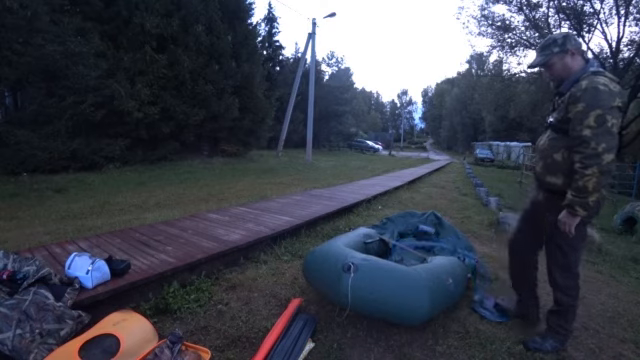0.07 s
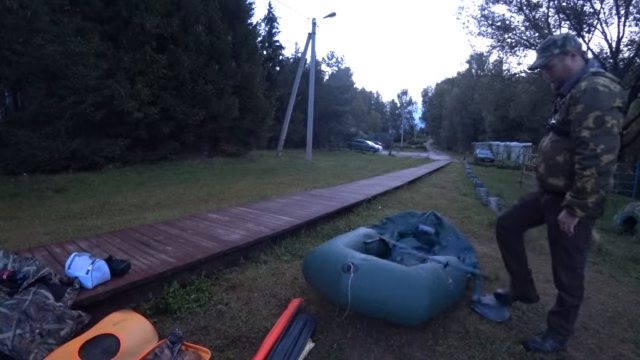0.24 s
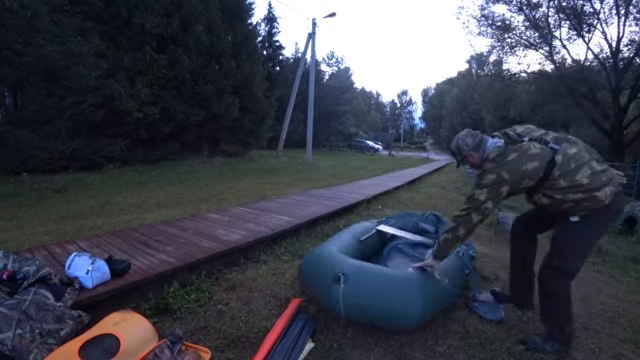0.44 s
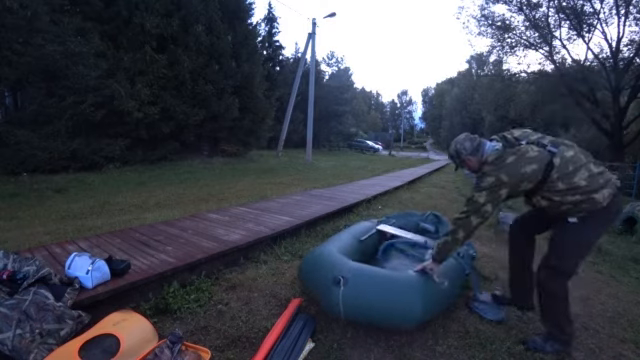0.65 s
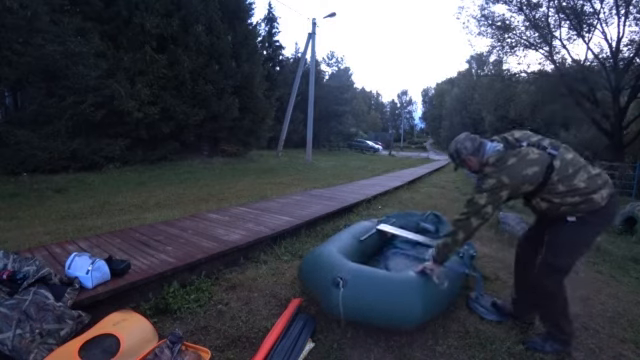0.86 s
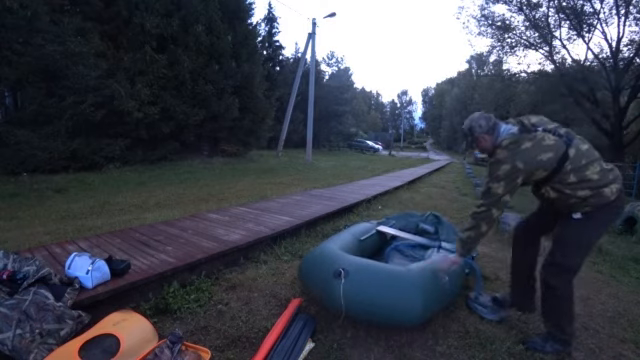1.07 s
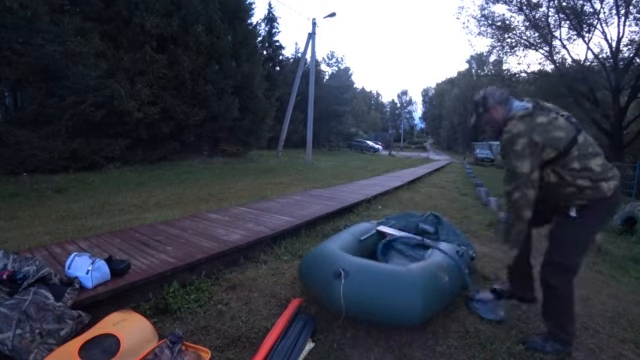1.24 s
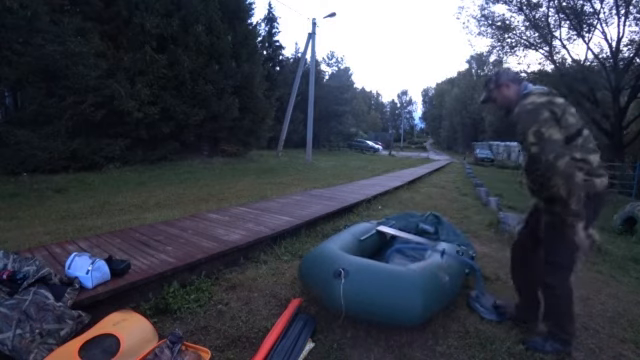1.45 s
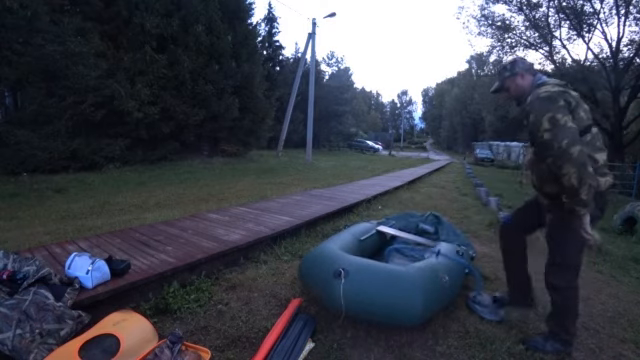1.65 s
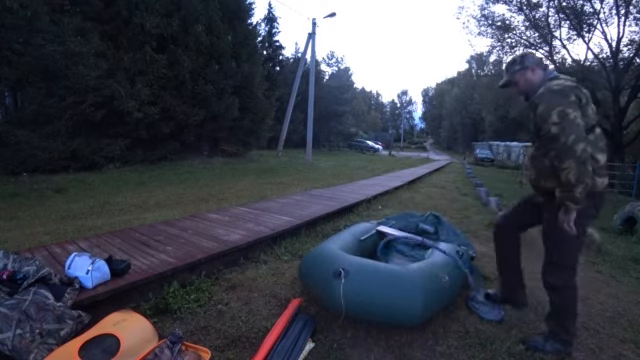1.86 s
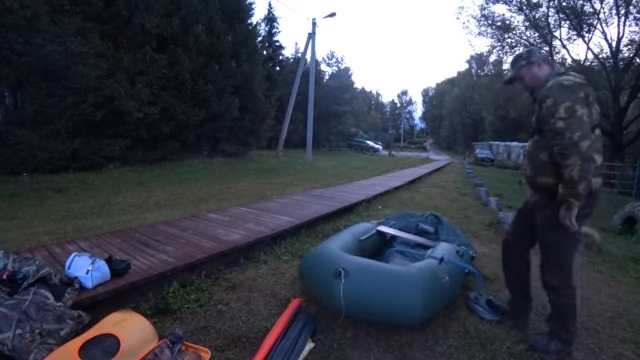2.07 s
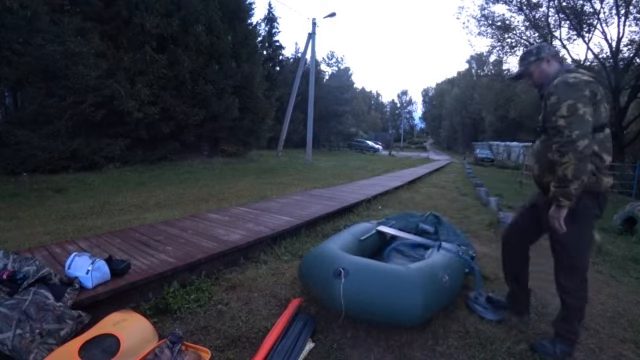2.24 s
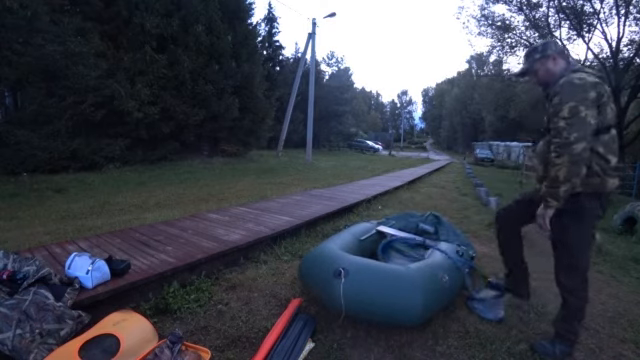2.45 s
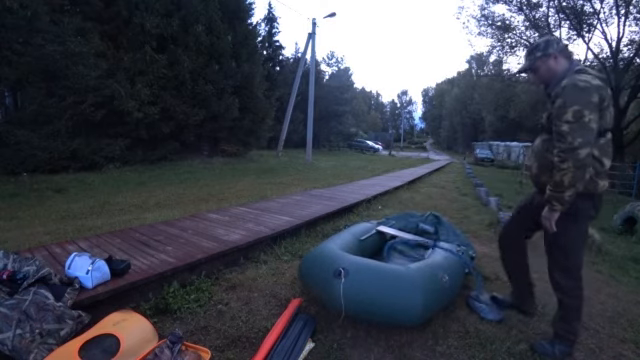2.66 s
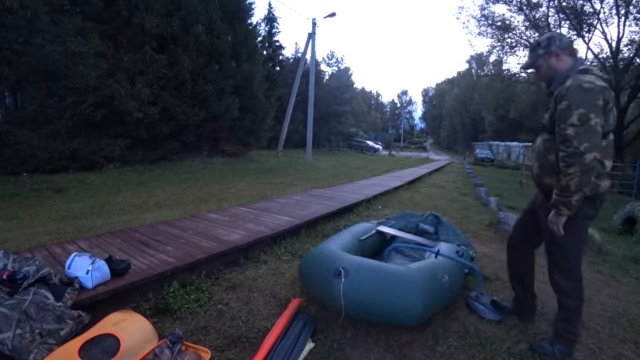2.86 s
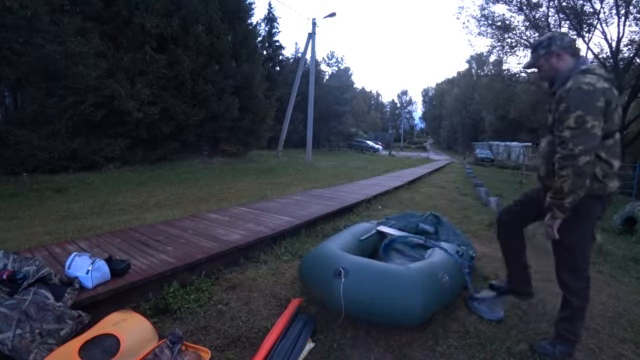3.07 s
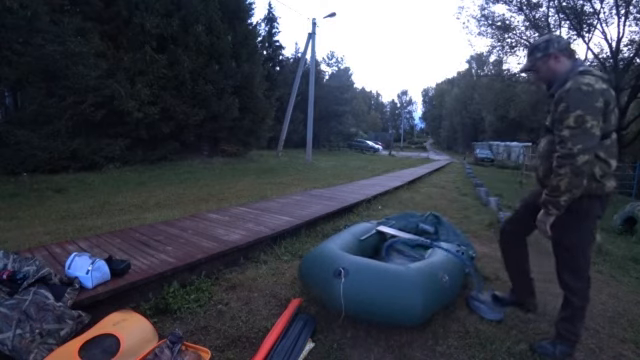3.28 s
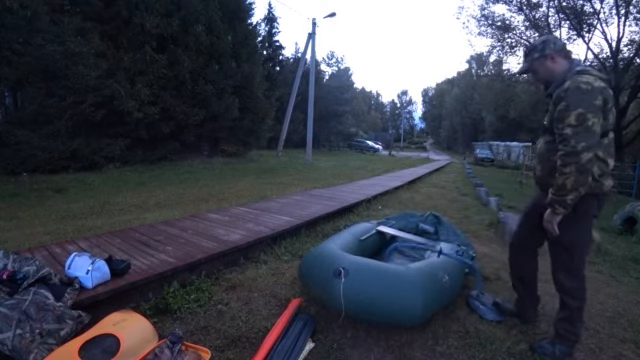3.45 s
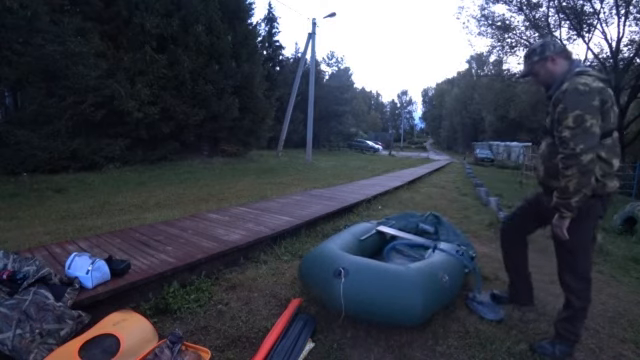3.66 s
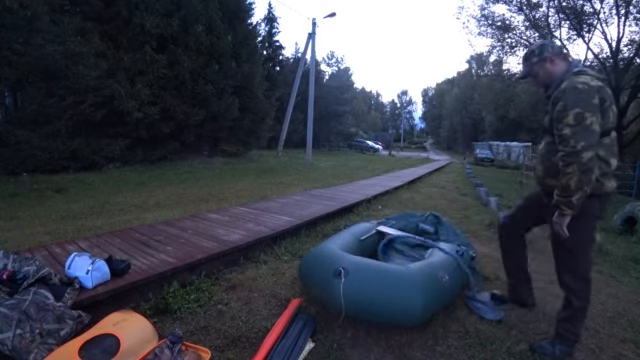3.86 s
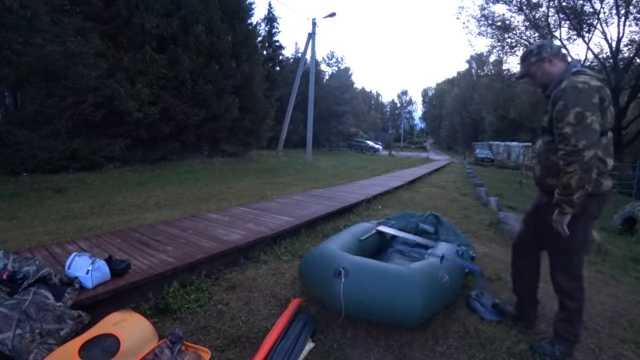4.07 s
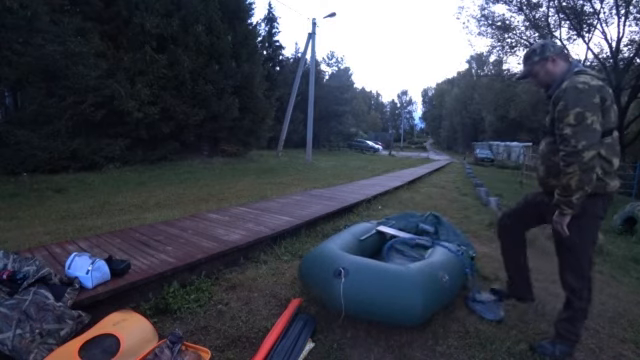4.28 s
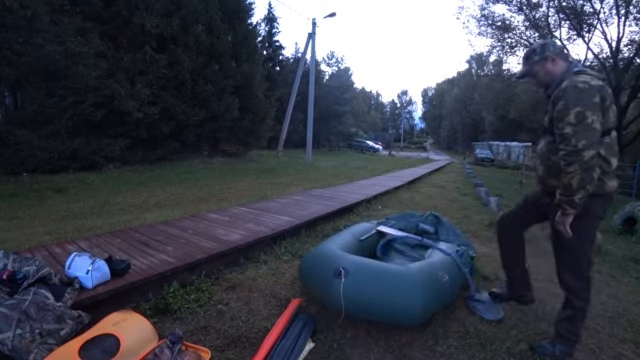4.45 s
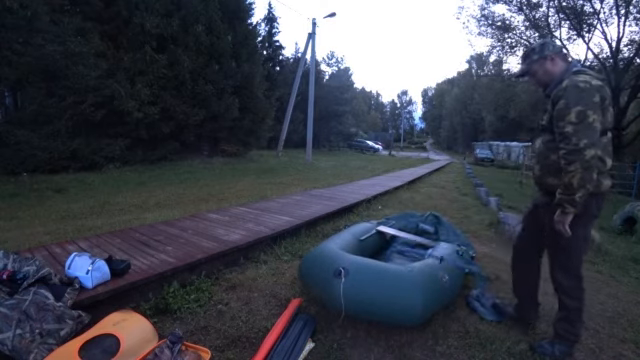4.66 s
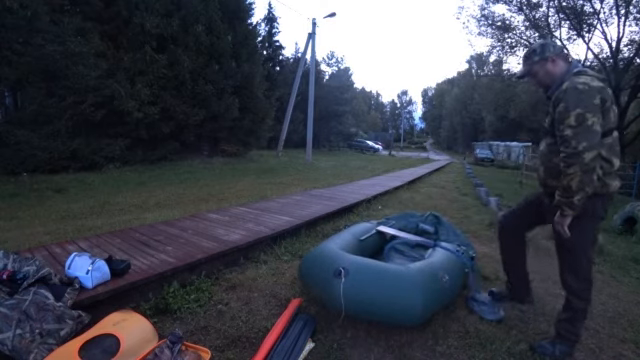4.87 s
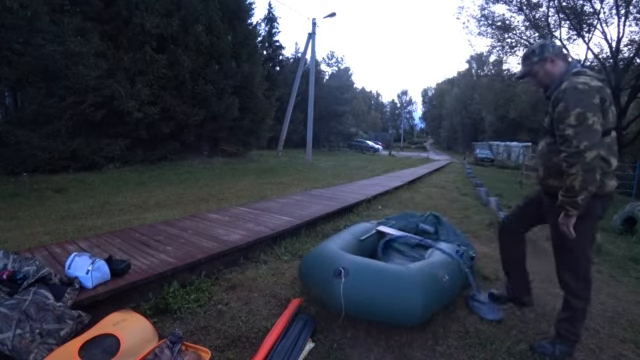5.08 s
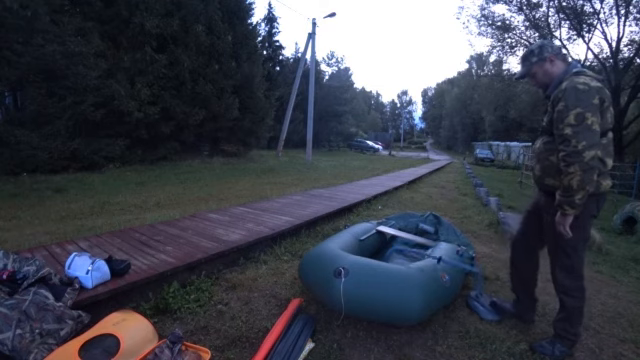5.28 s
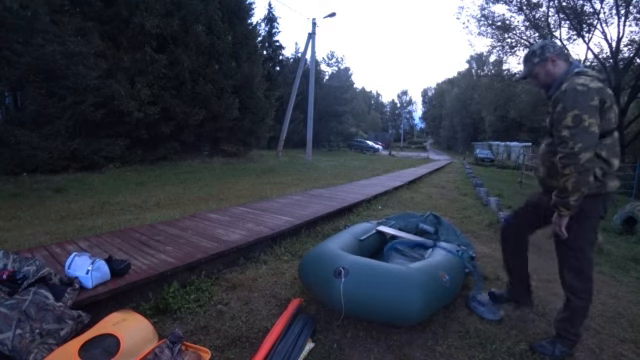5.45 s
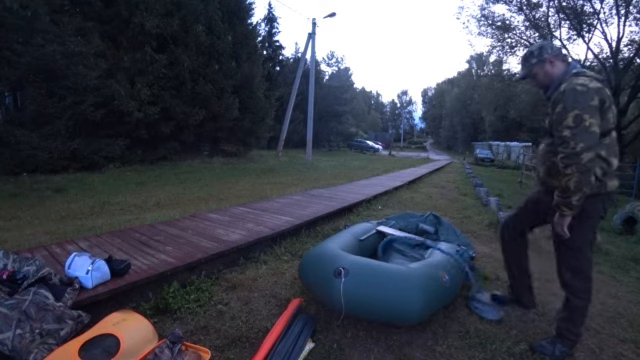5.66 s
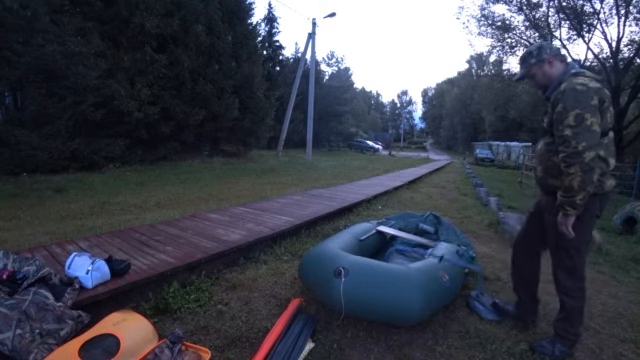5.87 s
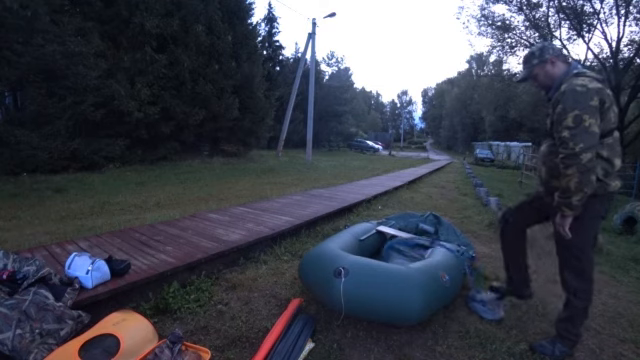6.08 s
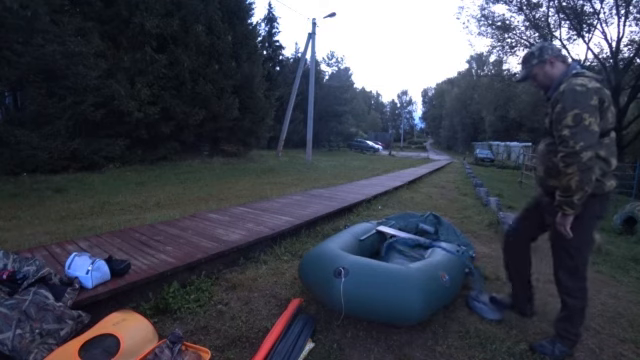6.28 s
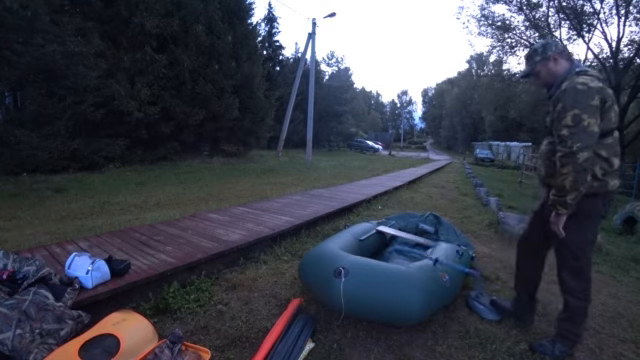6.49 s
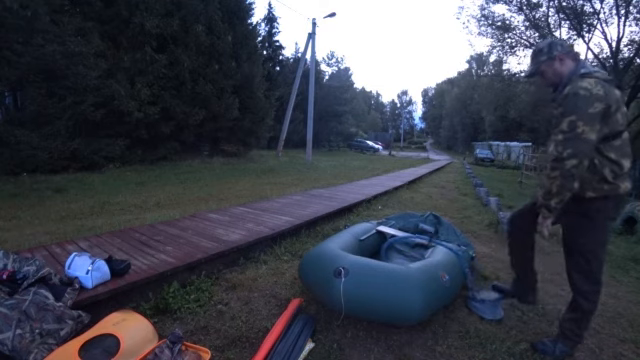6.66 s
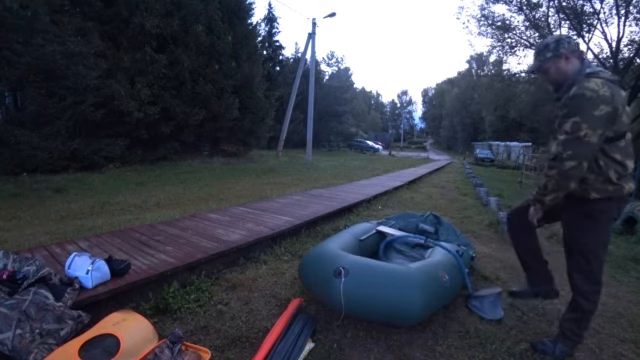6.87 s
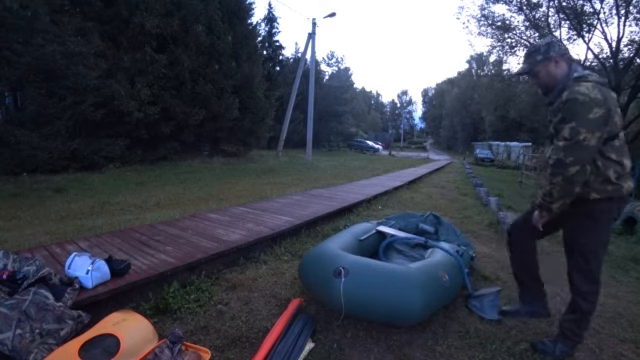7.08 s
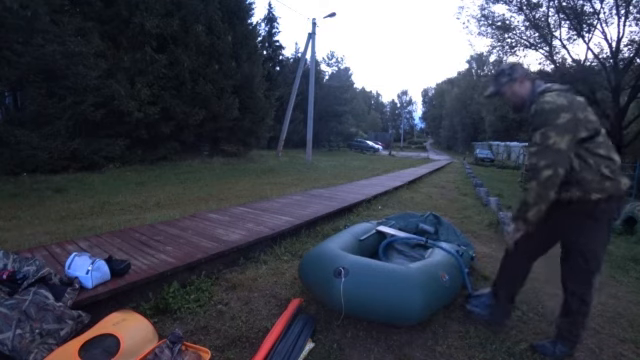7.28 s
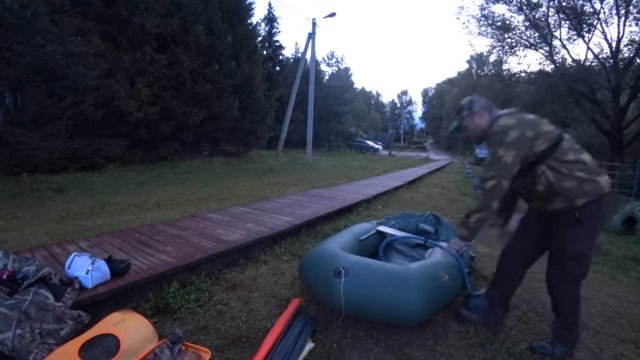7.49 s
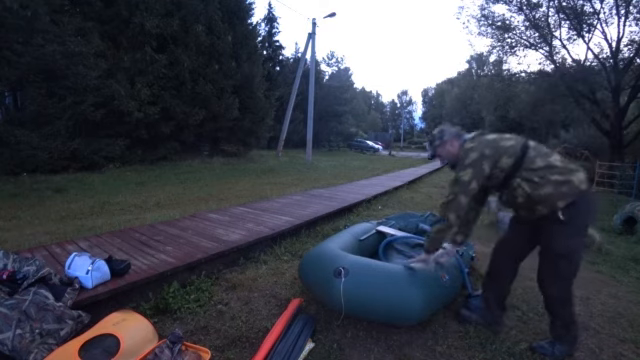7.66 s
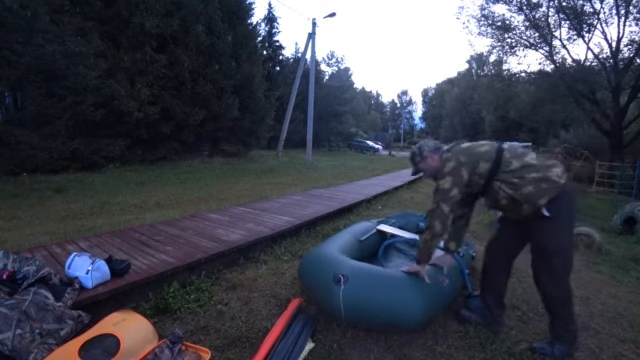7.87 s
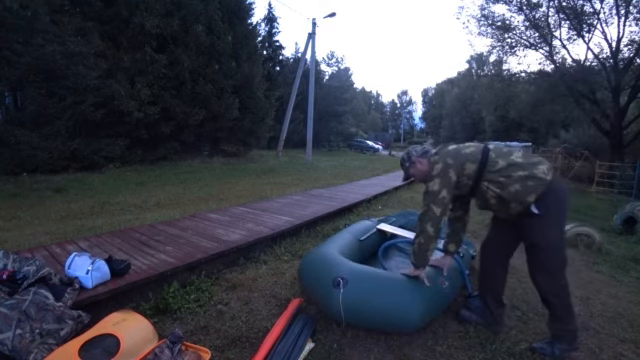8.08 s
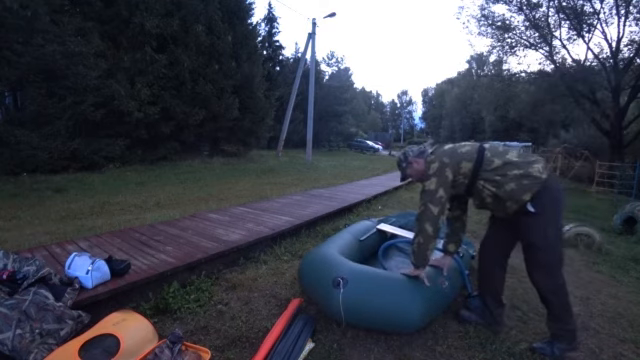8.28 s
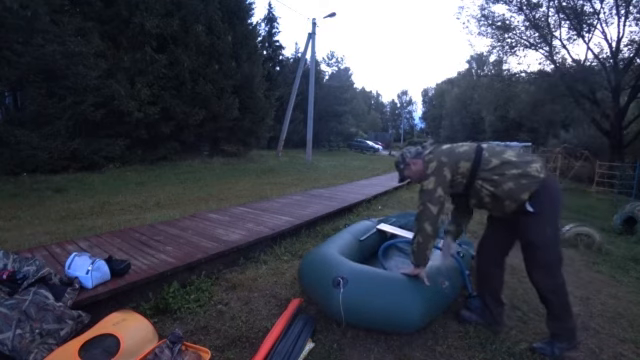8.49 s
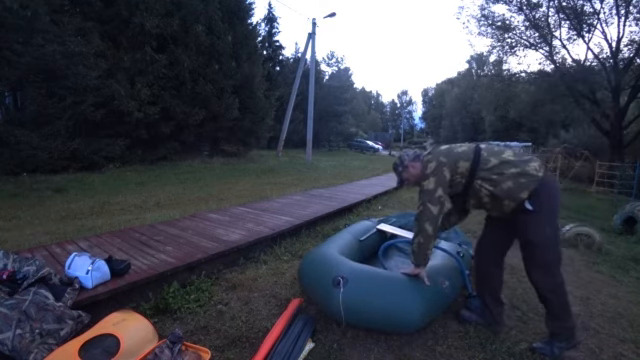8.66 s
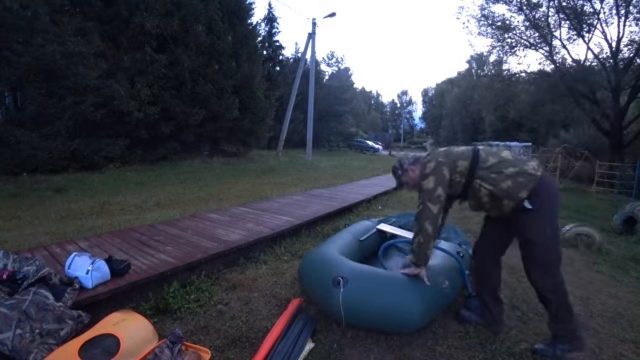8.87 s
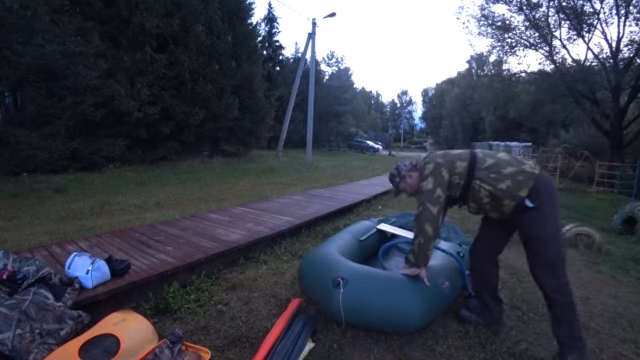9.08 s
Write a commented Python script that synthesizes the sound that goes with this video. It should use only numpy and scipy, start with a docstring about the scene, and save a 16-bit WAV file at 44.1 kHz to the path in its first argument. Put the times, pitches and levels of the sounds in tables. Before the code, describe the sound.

A foot pump hisses and gasps in steady strokes with knocks and clicking flap, inflating a rubber boat outdoors, then stops for soft rubbing.

```python
"""Broad hisses swell and fade about every 0.6 s, with narrower rushes of air, knocks and ticks between them.
A foot pump fills a rubber boat on a grassy bank: each tread presses air through the hose, and each release
sucks air in past a flap. Both are shaped noise; knocks, ticks and a squeak are short ringing tones.
A bush cricket, quiet air and a faint hum go on throughout; soft rubbing comes after the pumping stops."""
import sys
import numpy as np
from scipy import signal
from scipy.fft import rfft, irfft
from scipy.io import wavfile
from scipy.ndimage import uniform_filter1d

SR = 44100
rng = np.random.default_rng(int(sys.argv[2]) if len(sys.argv) > 2 else 0)


def generate_wav(sig):
    """Save sig (samples, or channels by samples) to the path in sys.argv[1] as 16-bit PCM at SR."""
    pcm = np.round(np.clip(np.atleast_2d(sig).T, -1, 1) * 32767).astype(np.int16)
    wavfile.write(sys.argv[1], SR, pcm)


N = 402633
T = np.arange(N) / SR  # time of each sample, s
HZ = np.fft.rfftfreq(1024, 1 / SR)  # pitches of a short-time spectrum
FRAME_T = (np.arange(N // 256 + 5) * 256 / SR)[:, None]  # time of each short-time spectrum, s

# Levels in the tables are settings at the source, ahead of the shared filters and echoes.
# Quiet outdoor air. Each row: pitch in Hz, relative level in dB.
AIR_COLOUR = [(30, -32), (60, -22), (95, -15), (120, 0), (180, -11), (260, 2), (800, 4.5), (2500, -0.5),
              (8500, -7), (11000, -7), (15900, -10.5)]
AIR_DB = -61.5
# Likeness of the air in the two channels. Each row: pitch in Hz, share from 0 to 1.
AIR_LIKENESS = [(150, 0.97), (600, 0.043), (3000, 0.041)]
# A faint far hum. Each row: pitch in Hz, relative level in dB.
HUM_TONES = [(123.8, -83.5), (247.6, -82)]
CRICKET_HZ, CRICKET_DB = 12600, -75.5
CHIRP_PERIOD_S, FIRST_CHIRP_S = .10255, .098

# Hands and cloth on the hull, one list a rub. Each row: time in seconds, body level in dB, treble level in dB.
RUBS = [
    [(7.641, -62, -70), (7.663, -55.5, -64), (7.755, -57.5, -57.5), (7.785, -62, -72), (7.85, -60.5, -70),
     (8.02, -77, -91)],
    [(8.33, -53, -67), (8.37, -65, -76), (8.42, -61, -65), (8.46, -73, -76)],
    [(8.821, -90, -71), (8.87, -68, -66), (9.016, -67, -72), (9.06, -82, -67), (9.119, -77, -86)],
]
# Sound colour of the rubbing. Each row: pitch in Hz, relative level in dB.
RUB_COLOUR = [(100, -17), (300, -5.5), (1100, 0.5), (2500, -8.5), (7000, -2), (12000, -12.5), (15900, -19)]
# Rubber on rubber. Each row: time in seconds, level in dB, pitch in Hz.
SQUEAK_PATH = [(2.736, -52, 958), (2.75, -46, 634), (2.764, -61, 557), (2.779, -54, 760)]

# Ticks of valve flap and plastic. Each row: time in seconds, relative level in dB, pitch in Hz.
TICKS = [(0.5777, -37, 3100), (.6173, -41, 3800), (.644, -38.5, 2900), (0.9426, -38, 2600),
         (1.2463, -30, 3400), (1.271, -34, 3400), (1.2863, -32, 3750), (1.5432, -36, 4100),
         (1.811, -33, 3400), (1.8278, -25.5, 2900), (1.847, -26, 3600), (1.8587, -31, 3200),
         (1.863, -31.5, 3950), (2.4896, -36.5, 2100), (2.5096, -33.5, 6300), (2.5447, -41.5, 3400),
         (2.566, -38, 3300), (2.5856, -33, 3080), (3.1732, -33.5, 5300), (3.2235, -39.5, 3200),
         (3.2488, -38.5, 3600), (3.2614, -37, 4300), (3.8124, -33, 5130), (3.843, -38.5, 4000),
         (3.8604, -35, 3700), (4.4138, -32.5, 5300), (4.4422, -28.5, 3740), (4.462, -39, 3300),
         (4.717, -35.5, 3180), (5.0146, -34, 3780), (5.0449, -39, 3500), (5.0663, -38.5, 3300),
         (5.603, -33, 4200), (5.6388, -32, 3400), (5.6608, -34.5, 3520), (6.1669, -32, 3600),
         (6.1929, -35.5, 4270), (6.2121, -34, 3470), (7.823, -50, 2900)]
# Ringing of the flap. Each row: pitch in Hz, relative level in dB, time to fall 60 dB in seconds.
TICK_MODES = [(2500, -39, 0.021), (3470, -4.5, 0.0054), (4440, -4.5, 0.0073), (6950, 0.5, 0.0081),
              (10700, -3, 0.008)]
# Knocks of boards and taut rubber. Each row: time in seconds, relative level in dB, basic pitch in Hz.
KNOCKS = [(0.117, -43, 447), (0.192, -27, 614), (0.241, -42, 380), (0.272, -42, 330), (.3717, -32, 776),
          (.401, -34, 328), (0.4233, -19, 1050), (.4337, -20.5, 634), (.441, -17.5, 440), (.487, -36, 310),
          (0.5961, -20, 503), (.612, -16, 910), (0.737, -34, 420), (.8578, -30.5, 1120), (.885, -33, 1310),
          (0.8946, -32, 1090), (0.925, -28.5, 1090), (1.081, -8, 585), (1.135, -30.5, 300),
          (1.212, -28.5, 533), (1.2468, -23.5, 605), (1.2595, -11.5, 660), (1.2878, -27.5, 770),
          (1.351, -34, 1000), (1.5314, -32, 890), (1.5446, -27, 1050), (1.621, -26, 1100),
          (1.649, -9.5, 735), (1.695, -30, 380), (1.812, -19.5, 457), (1.8362, -18, 880),
          (1.8464, -20, 363), (2.072, -35, 700), (2.111, -33, 434), (2.2242, -32.5, 595),
          (2.2821, -18.5, 447), (2.352, -32, 350), (2.4911, -24, 480), (2.5031, -22, 332),
          (2.5227, -17.5, 414), (2.535, -18, 984), (2.5855, -18.5, 590), (2.8554, -30.5, 1080),
          (2.927, -21.5, 546), (2.935, -22, 374), (2.9533, -18.5, 750), (2.9721, -16, 433),
          (3.1904, -19, 470), (3.1986, -25.5, 445), (3.2115, -20, 1010), (3.2609, -17.5, 580),
          (3.6274, -23, 620), (3.6363, -19, 570), (3.6483, -11.5, 560), (3.672, -31, 400),
          (3.8133, -28, 440), (3.8284, -17, 510), (3.8347, -16, 875), (3.8595, -33, 690),
          (3.8784, -29, 536), (4.119, -29, 690), (4.2, -26, 724), (4.2232, -28, 680), (4.2413, -15, 540),
          (4.288, -29, 400), (4.387, -24.5, 513), (4.4245, -18, 462), (4.4378, -20, 780), (4.444, -24, 430),
          (4.4618, -28, 730), (4.705, -28, 780), (4.7181, -24.5, 1250), (4.8411, -9.5, 610),
          (4.887, -32, 480), (4.9844, -28.5, 470), (5.028, -17.5, 460), (5.0371, -15.5, 760),
          (5.0666, -29, 600), (5.0866, -28.5, 560), (5.3869, -27.5, 754), (5.4349, -13, 550),
          (5.478, -31.5, 380), (5.621, -18.5, 490), (5.6325, -24, 500), (5.6453, -26.5, 400),
          (5.66, -28.5, 500), (5.886, -32.5, 1100), (5.9069, -27, 780), (5.9676, -26, 516),
          (6.0039, -8.5, 634), (6.0452, -30.5, 450), (6.143, -29, 400), (6.1791, -18, 477),
          (6.188, -15.5, 640), (6.225, -25.5, 550), (6.4025, -28, 1120), (6.4965, -30.5, 1000),
          (6.538, -30.5, 686), (6.571, -31, 440), (6.595, -29.5, 400), (6.601, -12.5, 645),
          (6.637, -30, 423), (6.705, -36.5, 300), (7.1006, -42, 344), (7.401, -49, 1110),
          (7.823, -41.5, 920), (8.3332, -33, 860), (8.34, -35.5, 1210), (8.895, -44, 600),
          (9.0123, -42, 345), (9.085, -49, 700)]
# The hollow bellows. Each row: pitch in Hz before detuning, relative level in dB, time to fall 60 dB in seconds.
BELLOWS_MODES = [(286.4, -6, 0.053), (539, -15.5, 0.052), (994, 0, 0.016)]
OPEN_RING_DB = -3.5  # the bellows rings less while the flap is open

# Treads. Each row: full flow reached in seconds, held in seconds, hiss level in dB before rounding,
# lowest pitch left as the bellows runs flat in Hz.
TREADS = [(0.028, 0.0067, -26, 3040), (.34, .005, -47.5, 1460), (0.763, 0.11, -41.5, 1900),
          (1.41, 0.022, -34, 3320), (1.968, 0.074, -37, 2580), (2.683, 0.092, -40.5, 2677),
          (3.389, 0.059, -37, 2300), (3.99, 0.051, -37, 2430), (4.596, 0.025, -36, 2450),
          (5.199, 0.055, -37, 2780), (5.79, 0.013, -35.5, 2480), (6.351, 0.0087, -34.5, 3170)]
PRESS_DB_PER_S, EMPTY_DB_PER_S, ROUND_S = 164, 91, 0.051  # a tread swells fast and dies slowly
# Releases, one after each tread. Each row: flap opens in seconds, time to strongest in seconds,
# open for in seconds, rush level in dB.
RELEASES = [(0.142, 0.057, 0.18, -34.5), (0.368, 0.068, 0.17, -38), (1.036, 0.055, 0.2, -35),
            (1.617, 0.024, 0.21, -33.5), (2.228, 0.077, 0.28, -35.5), (2.911, 0.062, 0.23, -37),
            (3.602, 0.052, 0.2, -36.5), (4.2, 0.047, 0.21, -35.5), (4.802, 0.042, 0.198, -35.5),
            (5.393, 0.038, 0.18, -35.5), (5.968, 0.037, 0.19, -35.5), (6.541, 0.08, .56, -36.5)]
OPENING_DB, FILL_DB_PER_S = -4, 59  # starts a little low, sags as the bellows fills
CLOSE_S, CLOSE_DB = 0.0087, -10  # closes fast
SHUTS_S = [opens + length for opens, _, length, _ in RELEASES]

# Sound colour of the hose air. Each row: pitch in Hz, relative level in dB.
HOSE_COLOUR = [(59, -80.5), (100, -38), (260, -24), (423, -26.5), (908, -8), (1950, -8), (2310, -5.5),
               (3170, -3.5), (3840, -5.5), (4750, -3.5), (5510, -8.5), (7100, -3.5), (8970, -16.5),
               (11300, -10), (15900, -26)]
# Standing waves in the hose. Each row: pitch in Hz, width in Hz, boost in dB at full flow before sway.
HOSE_MODES = [(2910, 60, 8), (3270, 60, 9), (4000, 40, 6), (4290, 40, 5), (4720, 60, 6), (6820, 170, 5)]
# Sound colour of the air sucked in. Each row: pitch in Hz, relative level in dB.
INLET_COLOUR = [(410, -20), (700, -15), (921, -6.5), (1290, -9.5), (1590, -2.5), (1940, -7), (3190, 1.5),
                (4140, -18), (4590, -12), (5520, -24.5), (6980, -7), (8950, -25.5), (10700, -13.5),
                (15100, -34), (15900, -21)]
FOLD_DB, UNFOLD_DB = -13.5, -16  # pops of the bellows wall, against tread and release
RATTLE_DB, RATTLE_S = -55, 0.083  # the wall rattles until this long after the flap shuts
# thin top hiss while the foot weighs on the bellows; the share is dB per dB of tread
SEEP_DB, SEEP_SHARE = -57.5, .3
SEEP_AFTER_S, SEEP_BEFORE_S = 0.095, 0.074  # starts after the flap shuts, stops before it opens

# Likeness of near sound at the two ports. Each row: pitch in Hz, likeness from -1 to 1 (kept from 0 to 1).
PORT_LIKENESS = [(400, .999), (4000, 1), (8000, 1), (13000, 0.41)]
# Left level against right, lower on the left. Each row: pitch in Hz, difference in dB.
LEFT_VS_RIGHT_DB = [(150, -1), (300, -0.5), (500, -1.5), (1100, -5.5), (4000, -2.5), (12000, -4)]
# Phase of left ahead of right. Each row: pitch in Hz, lead in radians.
LEFT_LEAD = [(8000, 0.27), (13400, -0.8), (14700, 0.016)]
DIP_START_S, DIP_END_S, DIP_DB = .31, .331, -28
EDGE_HZ = 15900  # upper limit of the whole sound


def gain_of(db):
    """Turns decibels into amplitude."""
    return 10 ** (np.asarray(db) / 20)


def evened(x):
    """Scales to an average strength (rms) of 1."""
    return x / np.sqrt(np.mean(x ** 2) + 1e-20)


def read(points, hz):
    """Reads a table between its rows on a log-frequency axis."""
    f, value = np.transpose(points)
    return np.interp(np.log(hz + 1), np.log(f + 1), value)


def follow(tables, column, rise_s=0.0037, fall_s=0.0014, off_db=-110):
    """Joins the tables into one level curve that falls silent just outside each."""
    out = np.full(N, float(off_db))
    for rows in tables:
        s, value = np.transpose(rows)[[0, column]]
        times = [s[0] - rise_s, *s, s[-1] + fall_s]
        out = np.maximum(out, np.interp(T, times, [off_db, *value, off_db]))
    return out


def noise(colour_db, patchy_db, channels=1):
    """Makes coloured noise from random short-time spectra with small louder and softer patches."""
    spectra = rng.standard_normal((channels, len(FRAME_T), len(HZ), 2)) @ [1, 1j]
    patches = rng.standard_normal(spectra.shape[1:])
    patches = uniform_filter1d(patches, size=4, axis=0)  # smooth over time
    patches = evened(uniform_filter1d(patches, size=10, axis=1))  # and over pitch
    spectra *= gain_of(colour_db + patchy_db * patches)
    _, sound = signal.istft(spectra.transpose(0, 2, 1), nperseg=1024, noverlap=768)
    return evened(sound[:, :N])


def band(x, lo_hz, hi_hz):
    """Keeps a band of pitches without delay."""
    edges = [lo_hz, min(hi_hz, SR / 2 - 1)]
    return signal.sosfiltfilt(signal.butter(2, edges, "band", fs=SR, output="sos"), x)


def add(mix, s, sound):
    """Mixes a sound in from time s."""
    part = mix[round(s * SR):][:len(sound)]
    part += sound[:len(part)]


def brightened(x, level_db, split_hz, slope, pivot_db, lag_s, even_db):
    """Above a pivot flow the treble grows by another amount than the rest, and a little sluggishly."""
    treble = band(x, split_hz, 21500)
    slow_db = uniform_filter1d(level_db, size=int(lag_s * SR) + 1)
    treble_db = slow_db + (slope - 1) * (np.maximum(slow_db, pivot_db) - even_db)
    return gain_of(level_db) * (x - treble) + gain_of(treble_db) * treble


def bank():
    """Quiet outdoor air is noise partly alike in both channels; the hum is a pair of steady tones."""
    left, other = noise(read(AIR_COLOUR, HZ), patchy_db=1.0, channels=2)
    hz = np.fft.rfftfreq(N, 1 / SR)
    same = np.clip(read(AIR_LIKENESS, hz), 0, 1)
    right = irfft(same * rfft(left) + np.sqrt(1 - same ** 2) * rfft(other), N)
    hum = sum(gain_of(db + 1.0) * np.sin(2 * np.pi * tone_hz * T) for tone_hz, db in HUM_TONES)
    return gain_of(AIR_DB) * np.array([left, right]) + hum


def cricket():
    """About ten buzzy chirps a second ride on a high tone whose pitch sways; noise makes the buzz."""
    phase = ((T - FIRST_CHIRP_S) / CHIRP_PERIOD_S) % 1
    chirps = np.exp(-((phase - .5) / 0.23) ** 2)
    buzz = band(rng.standard_normal((2, N)), 20, 350)
    hz = CRICKET_HZ + 250 * np.sin(2 * np.pi * 2.3 * T)
    tone = np.sin(2 * np.pi * np.cumsum(hz) / SR)
    return gain_of(CRICKET_DB) * evened(chirps * buzz * tone)


def rubbing():
    """Hands and cloth scratch softly, as noise; body and treble come and go apart."""
    rub = noise(read(RUB_COLOUR, HZ), patchy_db=1.5)[0]
    treble = band(rub, 3650, 12500)
    body_db = follow(RUBS, column=1, rise_s=0.012, fall_s=0.04)
    treble_db = follow(RUBS, column=2, rise_s=0.012, fall_s=0.04)
    return gain_of(body_db) * evened(rub - treble) + gain_of(treble_db) * evened(treble)


def squeak():
    """Rubber on rubber gives one short dipping tone with its octave."""
    s, _, hz = np.transpose(SQUEAK_PATH)
    turn = 2 * np.pi * np.cumsum(np.interp(T, s, hz)) / SR
    return gain_of(follow([SQUEAK_PATH], column=1)) * (np.sin(turn) + 0.91 * np.sin(2 * turn))


def ticks():
    """A burst of tiny contacts snaps and rings the flap; modes near the pitch of the tick lead."""
    out, t = np.zeros(N), np.arange(700) / SR
    for (s, db, pitch_hz), contacts in zip(TICKS, rng.standard_normal((len(TICKS), 100))):
        ring = np.zeros(len(t))
        for hz, level_db, t60 in TICK_MODES:
            mode_db = level_db - 14.6 * abs(np.log2(hz / pitch_hz)) - 60 * t / t60
            ring += gain_of(mode_db) * np.sin(2 * np.pi * hz * t)
        shuts = min(abs(s - .018 - end) for end in SHUTS_S) < .017
        # the flap slapping shut after a release has a bright edge
        snap = (2.5 if shuts else .9) * np.exp(-t * SR / 3.1)
        tick = np.convolve(ring + snap, contacts ** 3 * np.hanning(len(contacts)))
        add(out, s - .0015, gain_of(db + 10.5) * tick / abs(tick).max())
    return out


def knocks():
    """Each blow starts fast and slows within a cycle or two; the hollow bellows rings on, detuned by its folds."""
    out, t = np.zeros(N), np.arange(1800) / SR
    chances = rng.random((len(KNOCKS), 1 + len(BELLOWS_MODES)))
    for (s, db, hz), (turn, *folds) in zip(KNOCKS, chances):
        u = t * hz - 1.2  # cycles from the peak
        cycles = u - 0.026 * u * abs(u) - 0.46 * u ** 2 / (1 + u ** 2)
        swell = np.exp(-np.where(u < 0, (u / .35) ** 2, u / 0.37))
        blow = swell * np.sin(2 * np.pi * cycles + 1.82 * turn)
        hollow = np.zeros(len(t))
        for (f, level_db, t60), fold in zip(BELLOWS_MODES, folds):
            mode_db = level_db - 4.2 * abs(np.log2(hz / f)) - 60 * t / t60
            hollow += gain_of(mode_db) * np.sin(2 * np.pi * f * (0.739 + fold / 2) * t)
        is_open = any(row[0] < s < shut for row, shut in zip(RELEASES, SHUTS_S))
        hollow *= gain_of(OPEN_RING_DB * is_open) * np.clip(u, 0, 1)
        add(out, s - 1.183 / hz, -gain_of(db) * (blow + hollow))
    return out


def crumple():
    """The folding bellows wall pops softly at random, a few pops much larger, and rattles after the flap shuts."""
    sizes = gain_of(3.65 * np.minimum(rng.exponential(1, N), 4))
    pops = (rng.random(N) < 500 / SR) * sizes * rng.choice([-1, 1], N)  # about 500 a second
    rattles = [[(shuts + 0.0245, RATTLE_DB), (shuts + RATTLE_S, RATTLE_DB)] for shuts in SHUTS_S[:-1]]
    folding = gain_of(np.minimum(tread_db(), -44) + FOLD_DB)
    unfolding = gain_of(release_db() + UNFOLD_DB)
    rattling = gain_of(follow(rattles, column=1, fall_s=0.24))
    return (folding + unfolding + rattling) * evened(band(pops, 182, 1440))


def seep():
    """A fine high hiss holds almost steady through each tread but the second."""
    spans = []
    for i, ((opens, *_), (_, _, db, _)) in enumerate(zip(RELEASES, TREADS)):
        if i == 1:
            continue
        shut = SHUTS_S[i - 1] if i else -1  # the first is already under way
        spans.append([(shut + SEEP_AFTER_S, db), (opens - SEEP_BEFORE_S, db)])
    span_db = follow(spans, column=1, rise_s=0.13, fall_s=0.079)
    hiss = evened(band(rng.standard_normal(N), 9000, 16100))
    # loud treads add only a share; weak flow fades fully
    level_db = SEEP_DB + SEEP_SHARE * (np.maximum(span_db, -45) + 40) + np.minimum(span_db + 42, 0)
    return gain_of(level_db) * hiss


def release_db():
    """Level of the air sucked in: opens, peaks, sags, closes."""
    shapes = []
    for opens, rise, length, db in RELEASES:
        closing = opens + length - CLOSE_S
        last_db = db - FILL_DB_PER_S * (length - CLOSE_S - rise)
        shapes.append([(opens, db + OPENING_DB), (opens + rise, db), (closing, last_db),
                       (opens + length, last_db + CLOSE_DB)])
    return follow(shapes, column=1, rise_s=0.043, fall_s=0.013)


def releases():
    """Air is sucked in past the flap, as noise that starts and stops quickly."""
    rush = noise(read(INLET_COLOUR, HZ), patchy_db=0.6)[0]
    return brightened(rush, release_db(), split_hz=2070, slope=1.357, pivot_db=-58, lag_s=0.038, even_db=-46)


def tread_db():
    """Level of the air pressed out: swell, hold, decay, with rounded corners."""
    s, held, db, _ = np.transpose(TREADS)[:, :, None]
    swell = PRESS_DB_PER_S * np.maximum(s - T, 0)
    decay = EMPTY_DB_PER_S * np.maximum(T - s - held, 0)
    return uniform_filter1d((db - swell - decay).max(axis=0), size=int(ROUND_S * SR) + 1)


def treads():
    """Air forced through the hose: standing waves come and go, and a low edge climbs late in the stroke."""
    # a thin hiss never quite stops until the last release
    level_db = np.maximum(tread_db(), np.where(T < RELEASES[-1][0], -66., -110))
    flow = np.clip((np.interp(FRAME_T, T, level_db) + 48) / 15, 0, 1)  # only fast air excites the hose
    sway = rng.standard_normal((len(FRAME_T), len(HOSE_MODES)))
    sway = evened(uniform_filter1d(sway, size=12, axis=0))
    modes_db = sum(db * flow * (1 + 0.26 * sway[:, [k]]) / (1 + ((HZ - hz) / width) ** 2)
                   for k, (hz, width, db) in enumerate(HOSE_MODES))
    edge_hz = np.full(FRAME_T.shape, 300.)
    for (*_, hz), (end, *_) in zip(TREADS, RELEASES):
        climb_s = [end - .21, end - .08, end + 0.013, end + 0.017]
        edge_hz = np.maximum(edge_hz, np.interp(FRAME_T, climb_s, [0, hz, hz, 0]))
    thinned_db = -10 * np.log10(1 + (edge_hz / (HZ + 1)) ** 5)
    hiss = noise(read(HOSE_COLOUR, HZ) + modes_db + thinned_db, patchy_db=2.1)[0]
    return brightened(hiss, level_db, split_hz=12100, slope=1.04, pivot_db=-56, lag_s=.02, even_db=-33)


def surroundings(x):
    """Ground, boat and trees give back a thin short tail, mostly alike in both channels."""
    t = np.arange(9000) / SR
    sparse = rng.standard_normal((2, len(t))) * (rng.random((2, len(t))) < .05)
    taps = sparse * gain_of(-60 * t / 0.058) * (t > .003)
    taps = taps + 2.0 * taps[::-1]  # share echoes between the channels
    return signal.fftconvolve(x[None], taps / np.linalg.norm(taps[0]), axes=1)[:, :N]


def ports(x):
    """The two microphone ports hear a near source with different level, phase and a little smear."""
    hz, spectrum = np.fft.rfftfreq(N, 1 / SR), rfft(x)
    taps = rng.standard_normal(2000) * gain_of(-60 * np.arange(2000) / SR / 0.12)
    smeared = spectrum * rfft(taps / np.linalg.norm(taps), N)
    same = np.clip(read(PORT_LIKENESS, hz), 0, 1)
    half = gain_of(read(LEFT_VS_RIGHT_DB, hz) / 2) * np.exp(.5j * read(LEFT_LEAD, hz))
    apart = np.sqrt((1 - same) / 2) * smeared  # opposite at the two ports
    alike = np.sqrt((1 + same) / 2) * spectrum
    return irfft(np.array([(alike + apart) * half, (alike - apart) / half]), N)


def scene():
    """Puts pump and hands near the microphone, with the bank around."""
    near = treads() + seep() + releases() + crumple() + squeak() + knocks() + ticks()
    # small sources give no deep bass
    near = signal.sosfilt(signal.butter(3, 170, "high", fs=SR, output="sos"), near)
    hands = rubbing() * gain_of([[-.6], [.6]])  # slightly to the right
    echoes = gain_of(-10.5) * band(surroundings(near), 620, 18000)
    return ports(near) + hands + echoes + bank() + cricket()


def record(dry):
    """The level dips briefly near the start; then a filter removes the highest pitches."""
    dipping = (T > DIP_START_S) & (T < DIP_END_S)
    kept = dry * np.where(dipping, gain_of(DIP_DB), 1)
    limit = signal.firwin(511, EDGE_HZ, window=("kaiser", 9), fs=SR)
    return signal.oaconvolve(kept, limit[None], "same")


dry = scene()
out = record(dry)
generate_wav(out)
```